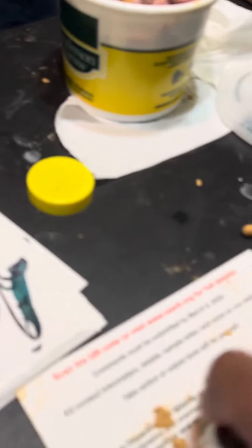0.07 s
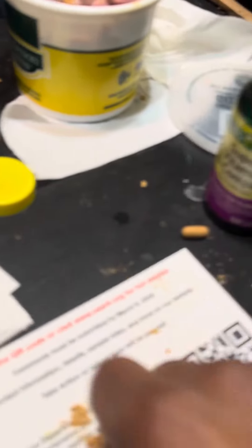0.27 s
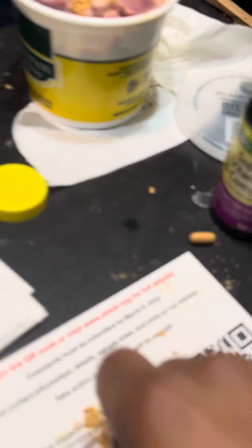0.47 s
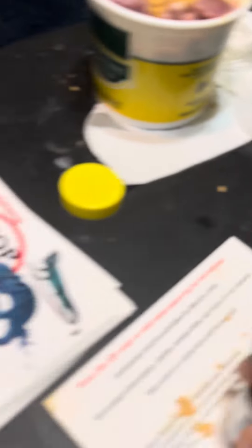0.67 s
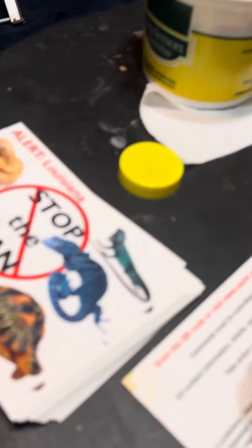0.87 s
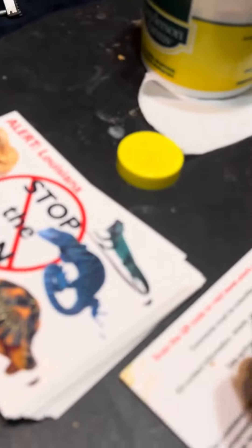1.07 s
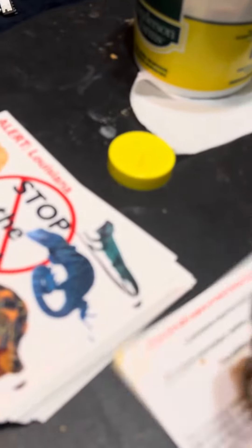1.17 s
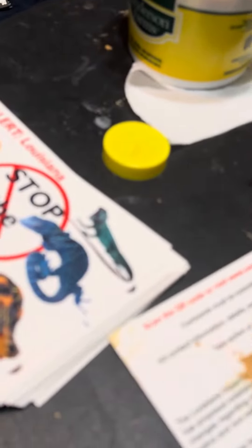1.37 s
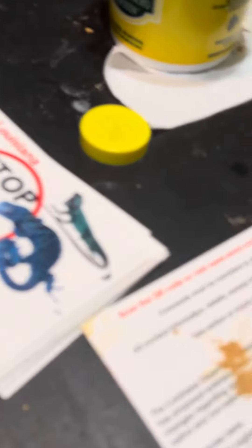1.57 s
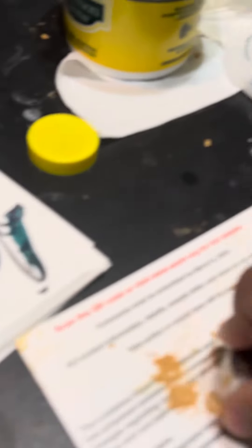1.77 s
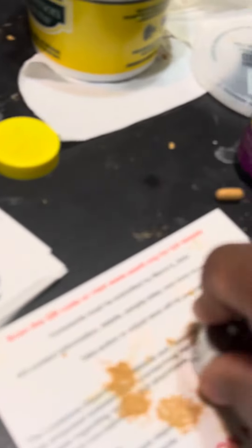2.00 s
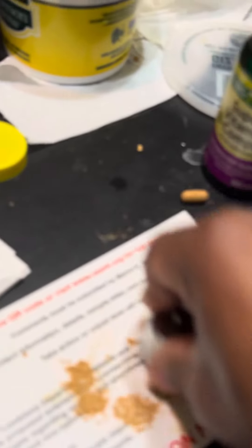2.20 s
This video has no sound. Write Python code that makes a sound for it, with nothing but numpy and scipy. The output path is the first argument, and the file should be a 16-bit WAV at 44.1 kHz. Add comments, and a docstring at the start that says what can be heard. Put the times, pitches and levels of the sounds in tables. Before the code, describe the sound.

A small hard jar crushes pills on a paper-covered table: a sharp knock at once, lighter rubbing and taps, a pause, more crunchy knocks, then the hardest crack near the end; close stereo microphone, small quiet room.

```python
"""Indoors, at a paper-covered table: a small hard jar taps and presses pills into powder close to two microphone ports.
Each thump is a falling bending wave plus ringing modes of the table top, over a low rumble.
Knocks chatter into the jar's modes; a stream of grains rubs them.
Pills snap as short noise cracks and powder crunches as a dense spray of tiny clicks.
A faint reverberant tail and steady room noise lie behind."""
import sys
import numpy as np
from scipy import signal
from scipy.fft import rfft, irfft
from scipy.io import wavfile

SR = 44100
rng = np.random.default_rng(int(sys.argv[2]) if len(sys.argv) > 2 else 0)


def output_pcm(signal):
    """Save a mono or channel-first signal as 16-bit PCM at the path in sys.argv[1].

    Samples are clipped to [-1, 1] before scaling.
    """
    pcm = np.clip(np.atleast_2d(signal).T, -1, 1) * 32767
    wavfile.write(sys.argv[1], SR, np.round(pcm).astype(np.int16))


N = 98739

# Room noise common to both ports. Each row: frequency in Hz, relative level in dB.
HUSH_COLOUR = [(30, -10), (55, 17), (150, 2), (250, 4), (400, -3.5), (620, -6), (750, -4.5), (810, 2.5),
               (880, -39), (980, -39), (1150, -7), (1620, -15.5), (2530, -8.5), (2970, -19), (3570, -13),
               (5400, -10), (6210, -25.5), (16500, -87)]
# Room noise opposed in the ports. Each row: frequency in Hz, relative level in dB.
HUSH_SIDE_COLOUR = [(30, -22), (220, -7), (380, -6), (660, -4.5), (930, -11), (1490, -22), (1800, -58),
                    (5900, -40), (6700, -27), (9000, -44), (12000, -29), (15500, -25), (16500, -15)]
HUSH_DB, HUSH_SIDE_DB = -60, -68.5

# Decay of the room. Each row: band centre in Hz, t60 in s.
ROOM_T60 = [(150, 0.28), (700, 0.3), (2500, 0.39), (9000, 0.16)]
# Colour of the opposed part of the tail. Each row: frequency in Hz, gain in dB.
ROOM_SIDE_COLOUR = [(150, -20), (700, 14.0), (1300, 15), (2100, -36)]
ROOM_DB, ROOM_SIDE_DB = -16.5, -20.5

# Port phase, left minus right. Each row: frequency in Hz, phase in rad.
PORT_PHASE = [(6000, 0), (7000, -1.2), (9000, -2.0), (10800, -2.6), (12500, -3.1), (14000, -3.7),
              (15700, -4.4)]
# Port level, left minus right. Each row: frequency in Hz, level in dB.
PORT_BALANCE = [(200, 0), (380, -.6), (700, -3.3), (1100, -3.8), (1600, -2.5), (2000, 0)]
LOW_CUT_HZ, EDGE_HZ = 40.5, 16500

# Table top shaken by the leaning hand. Each row: time in s, relative level in dB.
RUMBLE = [(0.0, -55), (0.15, -55), (0.32, -55), (0.55, -55), (0.72, -64), (0.94, -98), (1.13, -49),
          (1.32, -67.5), (1.51, -91), (1.71, -62), (2.11, -66.5), (2.24, -57)]
# Blows and presses into the table. Each row: start in s, relative level in dB, strongest pitch in Hz,
# table ring in dB and short knock in dB, both relative to the level.
THUMPS = [(.001, -49, 190, 22, 6), (0.0683, -22.5, 204, -7, -12), (0.175, -44.5, 88, -38, -4),
          (0.207, -40.5, 117, -2, 2), (0.284, -36.5, 165, 2, -4), (.305, -48, 70, 11, 11.5),
          (0.329, -43.5, 153, 8.5, -23), (.473, -39.5, 102, -8, 0), (0.557, -40, 126, -9, -8),
          (0.661, -48, 94, -42, -11), (0.9289, -27, 167, -8, -8), (1.0713, -38, 95, -24, 1.5),
          (1.131, -37.5, 113, -2, 0.5), (1.225, -48, 112, -1, 5.5), (1.5259, -27.5, 278, 6.5, 6.5),
          (1.541, -45, 303, -2, 4), (1.6, -43.5, 74.4, -16, 1), (1.71, -53.5, 252, 9, 11.5),
          (1.8, -45.5, 78.5, 1.5, -25), (1.9239, -15, 274, -9.5, -1), (2.018, -47, 87, -25, -29),
          (2.146, -47, 259, -18.5, -7)]
# Modes of the table top. Each row: frequency in Hz, relative level in dB, t60 in s.
TABLE_MODES = [(58.6, -7.5, 0.28), (105.2, -2.5, 0.2), (154.75, -1, 0.24), (193.3, -5, 0.32),
               (252, -2, 0.22), (317, -2, 0.33), (375.7, 5.5, 0.12), (422.2, -4.5, 0.2), (521, 7.5, 0.047)]
# Quickly damped modes under the paper. Each row: frequency in Hz, relative level in dB, t60 in s.
PANEL_MODES = [(415, 0, .06), (490, -2, .045)]
# The table top passes little above its body. Each row: frequency in Hz, gain in dB.
TABLE_COLOUR = [(510, 0), (640, -9), (2000, -14)]
BEND_TURNS, BEND_START_S = 1.454, 0.003377  # pitch in Hz = turns / seconds since the blow
BEND_WIDTH_LN, BEND_WIDTH_HIGH_LN = 0.51, 2  # log-time reach below and above the strongest pitch
BEND_RISE_S, RING_RISE_S, PANEL_DELAY_S = 0.0027, 0.017, 0.0022
RUMBLE_DB = -3.0

# Knocks of the jar. Each row: start in s, relative level in dB, relative brightness in dB,
# strongest low mode in Hz, strongest high mode in Hz.
KNOCKS = [(0.067, -23.5, -15.5, 876, 1870), (0.119, -36.5, -10, 930, 1870),
          (0.195, -38.5, -10.5, 880, 1720), (0.285, -40.5, -28, 980, 1600), (0.299, -35.5, -13, 940, 1900),
          (0.324, -37.5, -2.5, 1000, 1850), (0.3785, -41, 5.5, 1000, 2220), (0.386, -26.5, -19, 747, 2530),
          (0.445, -36, -5, 940, 1840), (0.561, -40.5, -42, 847, 1900), (0.574, -43.5, -15, 820, 1870),
          (0.927, -33.5, -9, 970, 1580), (0.941, -28, -12.5, 910, 1650), (0.956, -32, -11, 860, 1930),
          (1.034, -44, -11, 955, 1720), (0.477, -43.5, -22, 800, 1900), (1.073, -40, -27, 770, 1600),
          (1.145, -47, 5.5, 930, 1760), (1.162, -25, -14.5, 833, 2080), (1.173, -30.5, -31, 955, 2000),
          (1.526, -40, -31, 990, 1800), (1.533, -32, -22, 1040, 2150), (1.543, -43, 6, 890, 1750),
          (1.556, -49, 7, 960, 1780), (1.567, -33, -27, 990, 1900), (1.615, -32.5, -12, 1000, 1800),
          (1.622, -37, -36, 760, 1600), (1.801, -43, -25, 795, 1500), (1.9235, -37, -0.5, 785, 1900),
          (1.927, -21, -18.5, 890, 2140), (1.931, -24, -35, 884, 1500), (2.018, -40.5, -15, 930, 1900)]
# Low modes of the jar. Each row: frequency in Hz, relative level in dB, t60 in s.
JAR_LOW_MODES = [(670, 0, .04), (787, -3, .07), (897, -3, .05), (940, -1, .045), (1000, -5, .04),
                 (1098, -9, .035), (1390, -14, .025)]
# High modes of the jar. Each row: frequency in Hz, relative level in dB, t60 in s.
JAR_HIGH_MODES = [(1600, -2, .025), (1830, -3, .02), (1980, 0, .025), (2250, -2, .018), (2560, -3, .02),
                  (2900, -6, .012), (3300, -8, .012), (3700, -9, .012), (4800, -8, .01), (5450, -8, .012)]
# The jar rubbing over powder. Each row: time in s, relative level in dB, high over low modes in dB.
JAR_RUB = [(0, -44.5, 0.5), (0.059, -109, -36), (0.068, -33, -26), (.16, -61.5, 0), (0.199, -39.5, -11),
           (0.233, -50.5, -13), (0.272, -64.5, 2), (0.29, -38, -15), (0.334, -39.5, -9), (.37, -57.5, 1),
           (0.389, -44.5, 1), (0.462, -53, -5), (.54, -62.5, -8), (.58, -53, -12), (.7, -68, 1),
           (0.921, -83, 15), (0.93, -35, -0.5), (0.969, -50.5, -8.5), (1.02, -74, 14), (1.1, -50, -12.5),
           (1.119, -44, -4.5), (1.171, -36.5, -3), (1.21, -79, -10), (1.3, -86, -11), (1.52, -81, 8),
           (1.53, -29.5, -7), (1.58, -54, 2.5), (1.661, -57.5, -12), (1.721, -37, -7), (1.759, -79, 4.5),
           (1.81, -53.5, -9.5), (1.916, -89, -2), (1.927, -37, -1), (1.948, -60, 11), (2.0, -59.5, 1.5),
           (2.12, -67, -6), (2.191, -53.5, -9), (2.24, -65, -10)]
# The small jar radiates little bass. Each row: frequency in Hz, gain in dB.
JAR_RADIATION = [(400, -16), (640, -10), (760, 0)]
CHATTER_S, CHATTER_PER_S, CHATTER_SPREAD_DB = 0.0035, 2500, 3
KNOCK_BRIGHT_DB = 7.5  # added to every knock's brightness
RUB_DB, RUB_PER_S, RUB_SPREAD_DB = -6, 900, 3
# dB lost per octave from the strongest pitch
TABLE_FOCUS_DB, JAR_LOW_FOCUS_DB, JAR_HIGH_FOCUS_DB = 11, 46, 18

# Powder crunching on paper. Each row: time in s, relative level in dB.
GRIT = [(0, -43.5), (0.06, -121), (0.075, -54), (0.16, -59), (0.24, -53), (0.3, -54.5), (0.4, -49),
        (0.54, -63), (0.6, -48), (0.7, -69), (0.92, -71), (0.935, -38), (0.965, -43.5), (1.1, -58),
        (1.125, -39.5), (1.15, -34), (1.18, -47), (1.26, -67), (1.515, -69), (1.535, -29.5), (1.58, -49.5),
        (1.68, -59), (1.71, -37.5), (1.74, -55), (1.78, -58), (1.88, -66), (1.918, -66), (1.93, -19),
        (1.95, -60), (2.1, -63), (2.14, -54), (2.24, -85)]
# Pill fragments snapping. Each row: start in s, relative level in dB, treble tilt in dB.
SNAPS = [(0.0642, -23, 1), (0.067, -38, 11), (0.0681, -32.5, -4), (0.118, -39.5, -19), (0.192, -35, 12),
         (0.1941, -37.5, -31), (0.3217, -40, -28), (0.3557, -40, 4), (0.3836, -35, -21), (0.5871, -40, 15),
         (0.5894, -35.5, 10), (0.9246, -34.5, 15), (0.9282, -24.5, -24), (0.9391, -52, 0),
         (0.9415, -27.5, 2), (0.9435, -27, 7), (0.956, -34, 13), (0.9608, -24.5, 7), (0.9988, -40, -8),
         (1.004, -31.5, 8), (1.028, -38, 0), (1.0339, -38, 7), (1.0618, -40.5, 6), (1.1071, -41, 16),
         (1.1314, -39, 0), (1.1425, -40, 6), (1.1637, -41.5, 10), (1.525, -34, -10), (1.537, -31.5, -23),
         (1.5424, -24, 0), (1.5578, -32, 9), (1.6146, -40, -17), (1.6924, -32.5, 16), (1.7146, -34, 30),
         (1.7179, -40.5, 8), (1.7203, -38, -15), (1.729, -35, 25), (1.7758, -26.5, 20), (1.7789, -32.5, 6),
         (1.9233, -26, -11), (1.9272, -24.5, -25), (1.9305, -22, -20), (1.9315, -20, 2), (1.9346, -21, 14),
         (1.9389, -31.0, 13), (2.0308, -39, 2), (2.1356, -43, 14)]
# Colour of snaps and grit. Each row: frequency in Hz, gain in dB.
CRISP_COLOUR = [(2000, -21), (4800, -4), (6300, -5.5), (8000, 4), (10500, 0.5), (12500, 0), (15000, 6.5),
                (17000, -34)]
# Tiny cracks carry no bass. Each row: frequency in Hz, gain in dB.
CRISP_FOOT = [(700, -30), (2000, 0)]
GRIT_DB, GRIT_PER_S, GRIT_SPREAD_DB = -10.5, 11000, 6
SNAP_DB, SNAP_RISE_S, SNAP_DECAY_S = 14.0, 0.0001, 0.00045


def amp(db):
    """dB to gain."""
    return 10 ** (np.asarray(db) / 20)


def evened(x):
    """Scales to rms 1."""
    return x / np.sqrt(np.mean(x ** 2) + 1e-20)


def curve(points):
    """Gain over time from (s, dB) rows."""
    return amp(np.interp(np.arange(N) / SR, *np.transpose(points)))


def read(points, hz):
    """Table value on a log-frequency axis."""
    f_hz, value = np.transpose(points)
    return np.interp(np.log(hz + 1), np.log(f_hz + 1), value)


def colour(x, points):
    """Filters by a (Hz, dB) table, zero phase."""
    hz = np.fft.rfftfreq(x.shape[-1], 1 / SR)
    return irfft(rfft(x) * amp(read(points, hz)), x.shape[-1])


def add(mix, start_s, sound):
    """Mixes a sound in at its start time."""
    part = mix[round(start_s * SR):][:len(sound)]
    part += sound[:len(part)]


def focus(modes, top_hz, loss_db):
    """Favours the modes near one pitch, losing loss_db per octave away from it."""
    return [(hz, db - loss_db * abs(np.log2(hz / top_hz)), t60_s) for hz, db, t60_s in modes]


def ring(modes, spread_db=0.):
    """Impulse response of an object, peak 1; each mode's level varies randomly by spread_db."""
    t = np.arange(SR // 3) / SR
    out = np.zeros(len(t))
    for hz, db, t60_s in modes:
        level_db = db + spread_db * rng.standard_normal()
        out += amp(level_db - 60 * t / abs(t60_s)) * np.sin(2 * np.pi * hz * t)
    return out / abs(out).max()


def grains(per_s, spread_db, count):
    """Sparse clicks of random sign and uneven size."""
    size = amp(spread_db * np.minimum(rng.exponential(1, count), 4))
    sign = rng.choice([-1, 1], count)
    return size * sign * (rng.random(count) < per_s / SR)


def room_noise():
    """Steady coloured noise: a part common to both ports and a part opposed in them."""
    side = amp(HUSH_SIDE_DB) * evened(colour(rng.standard_normal(N), HUSH_SIDE_COLOUR))
    mid = amp(HUSH_DB) * evened(colour(rng.standard_normal(N), HUSH_COLOUR))
    return mid, side


def room(x):
    """Two unrelated noise tails, each band dying at its own speed."""
    hz, t, bands = signal.stft(rng.standard_normal((2, SR // 2)), SR, nperseg=256)
    decay = amp(-60 * t / abs(read(ROOM_T60, hz))[:, None])
    tail = signal.istft(bands * decay, SR, nperseg=256)[1]
    tail = tail * np.minimum(np.arange(tail.shape[1]) / (0.014 * SR), 1)  # 14 ms build-up
    return signal.fftconvolve(x[None], tail / np.linalg.norm(tail[0]), axes=1)[:, :N]


def ports(x):
    """The two microphone ports differ in phase in the treble and in level around 1 kHz."""
    hz = np.fft.rfftfreq(N, 1 / SR)
    half = np.exp(.5j * read(PORT_PHASE, hz)) * amp(read(PORT_BALANCE, hz) / 2)
    return irfft(rfft(x) * np.array([half, 1 / half]), N)


def table_rumble():
    """Noise shakes the modes of the table top under the leaning hand."""
    shake = signal.oaconvolve(rng.standard_normal(N), ring(TABLE_MODES))[:N]
    return amp(RUMBLE_DB) * curve(RUMBLE) * evened(shake)


def table_thumps():
    """Bending waves arrive high pitch first; the table top then rings."""
    out, t = np.zeros(N), np.arange(1, SR // 3) / SR
    for start_s, db, hz, ring_db, knock_db in THUMPS:
        late = np.log(t * hz / BEND_TURNS)  # 0 when the strongest pitch arrives
        width = np.where(late < 0, BEND_WIDTH_HIGH_LN, BEND_WIDTH_LN)
        shape = np.exp(-.5 * (late / width) ** 2) * np.minimum(t / BEND_RISE_S, 1) ** 2
        bend = shape * np.cos(2 * np.pi * BEND_TURNS * np.log(t / BEND_START_S))
        struck = ring(focus(TABLE_MODES, hz, TABLE_FOCUS_DB), spread_db=3)[1:]
        struck = struck * np.minimum(t / RING_RISE_S, 1)
        add(out, start_s, amp(db) * (bend + amp(ring_db) * struck))
        add(out, start_s + PANEL_DELAY_S, amp(db + knock_db) * ring(PANEL_MODES))
    return colour(out, TABLE_COLOUR)


def jar_rub():
    """A stream of grains under the jar excites its low and high modes."""
    out = np.zeros(N)
    rub = evened(grains(RUB_PER_S, RUB_SPREAD_DB, count=N))
    time_s, db, bright_db = np.transpose(JAR_RUB)
    for modes, level_db in ((JAR_LOW_MODES, db), (JAR_HIGH_MODES, db + bright_db)):
        body = ring(modes)
        drive = rub * curve(np.transpose([time_s, level_db]))
        out += amp(RUB_DB) * signal.oaconvolve(drive, body / np.linalg.norm(body))[:N]
    return colour(out, JAR_RADIATION)


def jar_knocks():
    """One hard contact and a short dying chatter strike the jar's modes."""
    out, t = np.zeros(N), np.arange(600) / SR
    for start_s, db, bright_db, low_hz, high_hz in KNOCKS:
        chatter = grains(CHATTER_PER_S, CHATTER_SPREAD_DB, count=600) * np.exp(-t / CHATTER_S)
        chatter[0] += 5  # first contact
        low_modes = focus(JAR_LOW_MODES, low_hz, JAR_LOW_FOCUS_DB)
        high_modes = focus(JAR_HIGH_MODES, high_hz, JAR_HIGH_FOCUS_DB)
        low = signal.oaconvolve(chatter, ring(low_modes, spread_db=2))
        high = signal.oaconvolve(chatter, ring(high_modes, spread_db=2))
        high_gain = amp(bright_db + KNOCK_BRIGHT_DB)
        add(out, start_s, amp(db) * (low / abs(low).max() + high_gain * high / abs(high).max()))
    return colour(out, JAR_RADIATION)


def powder_grit():
    """Crushed powder is a dense spray of tiny cracks."""
    return amp(GRIT_DB) * evened(grains(GRIT_PER_S, GRIT_SPREAD_DB, count=N)) * curve(GRIT)


def pill_snaps():
    """A breaking fragment releases a bright noise crack, decaying in about half a millisecond."""
    out, t = np.zeros(N), np.arange(256) / SR
    for start_s, db, tilt_db in SNAPS:
        shape = (1 - np.exp(-t / SNAP_RISE_S)) * np.exp(-t / SNAP_DECAY_S)
        crack = np.roll(rng.standard_normal(256) * shape, 40)  # room for the filter's pre-ring
        crack = colour(crack, [(7000, -tilt_db / 2), (15000, tilt_db / 2)])
        add(out, start_s - 44 / SR, amp(db + SNAP_DB) * crack / np.linalg.norm(crack))
    return out


def pills():
    """Snaps and grit share the bright colour of small cracks."""
    return colour(colour(pill_snaps() + powder_grit(), CRISP_COLOUR), CRISP_FOOT)


def scene():
    """All sources, their room tail and the room noise, as left and right."""
    dry = table_thumps() + table_rumble() + jar_knocks() + jar_rub() + pills()
    wet = amp(ROOM_DB) * room(dry)
    noise_mid, noise_side = room_noise()
    side = amp(ROOM_SIDE_DB) * colour(wet[1], ROOM_SIDE_COLOUR) + noise_side
    return ports(dry + wet[0]) + noise_mid + side * np.array([[1], [-1]])


def record(dry):
    """Bass roll-off of the microphone, then the band limit."""
    low_cut = signal.butter(4, LOW_CUT_HZ, "high", fs=SR, output="sos")
    band_limit = signal.firwin(511, EDGE_HZ, window=("kaiser", 9), fs=SR)
    return signal.oaconvolve(signal.sosfilt(low_cut, dry), band_limit[None], "same")


dry = scene()
out = record(dry)
output_pcm(out)
```